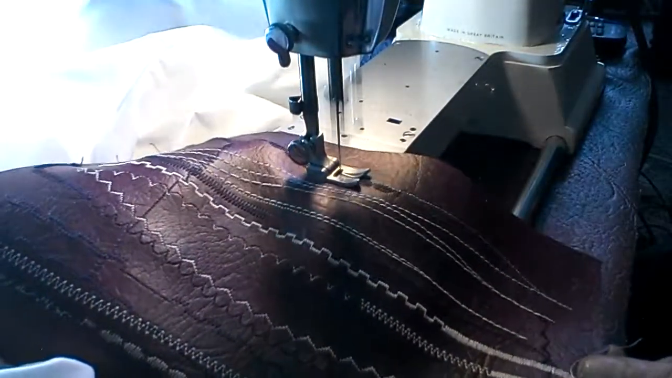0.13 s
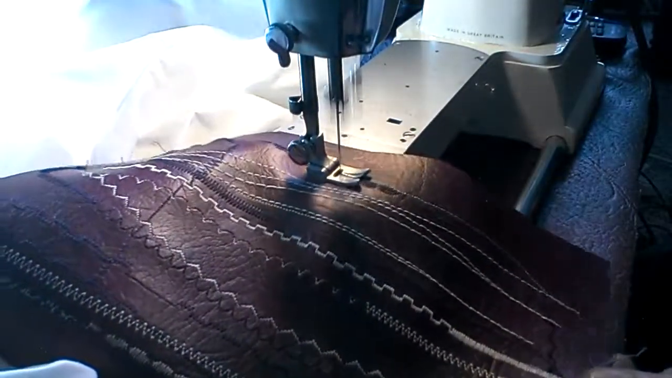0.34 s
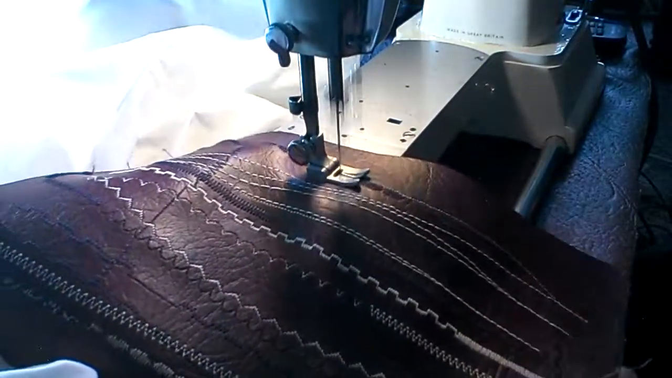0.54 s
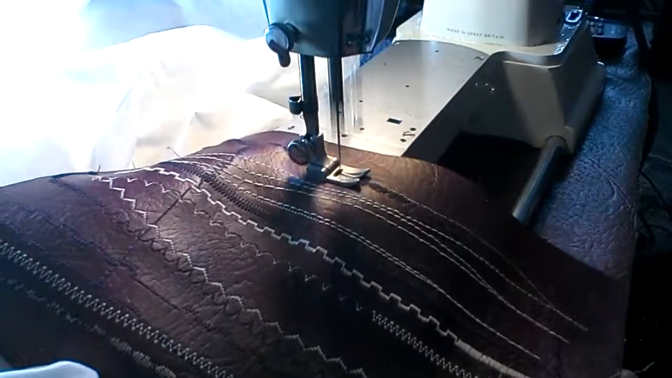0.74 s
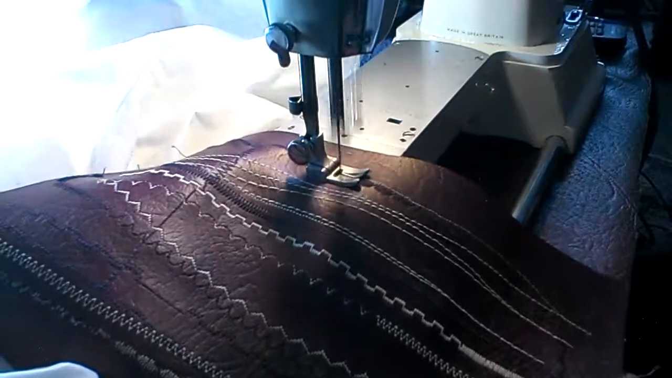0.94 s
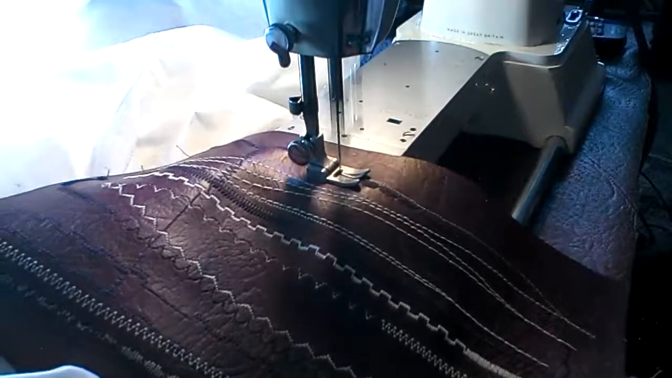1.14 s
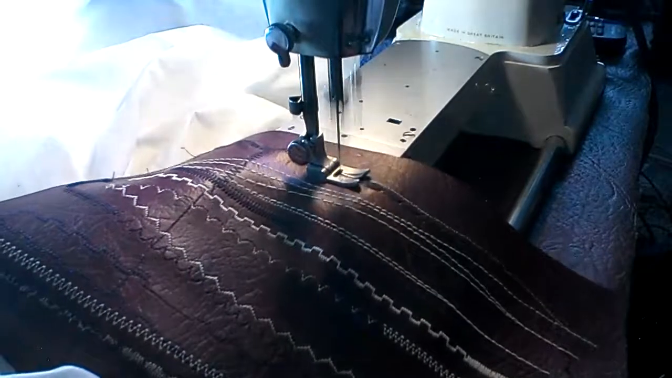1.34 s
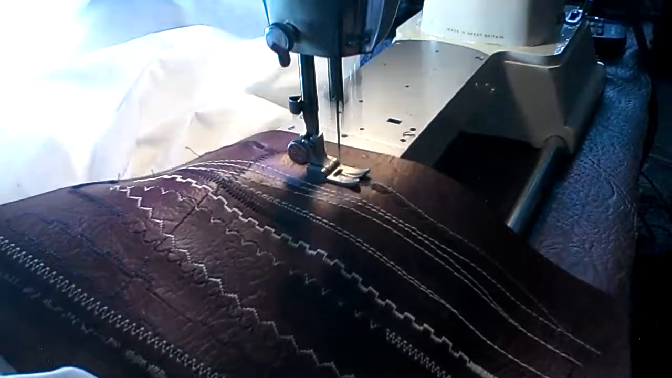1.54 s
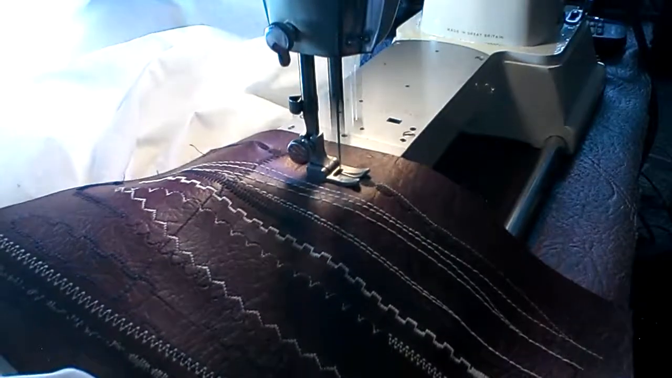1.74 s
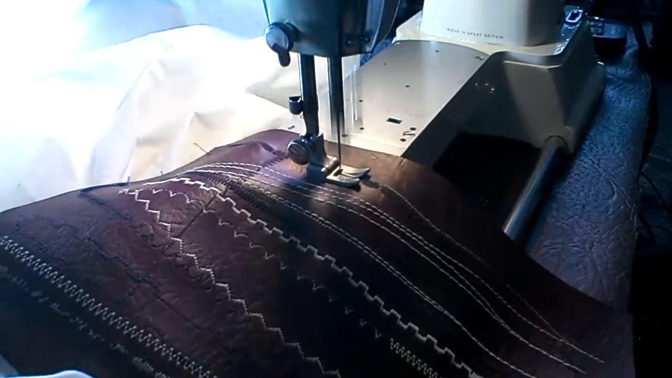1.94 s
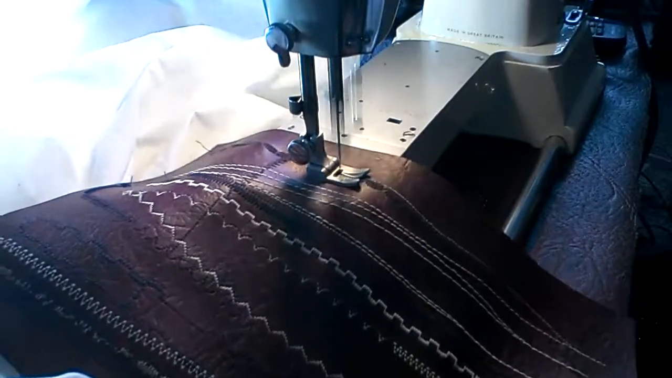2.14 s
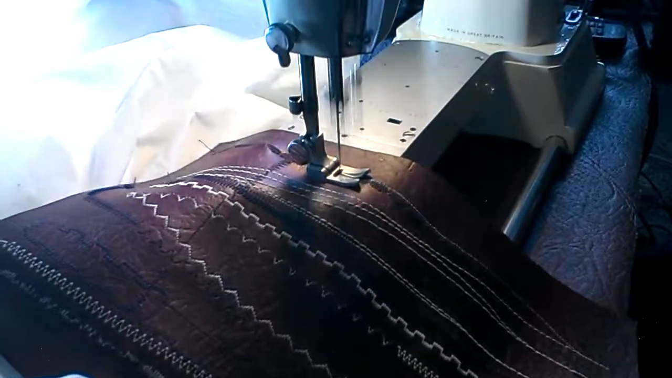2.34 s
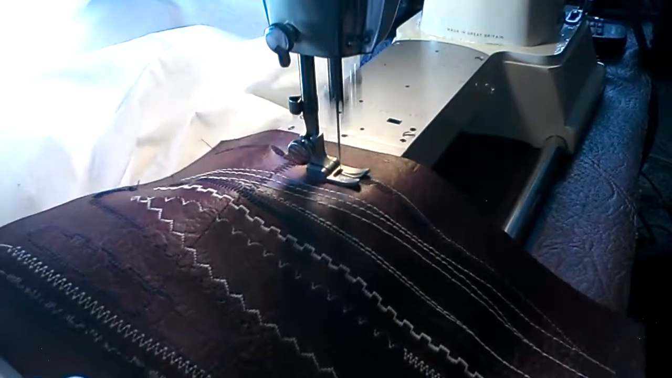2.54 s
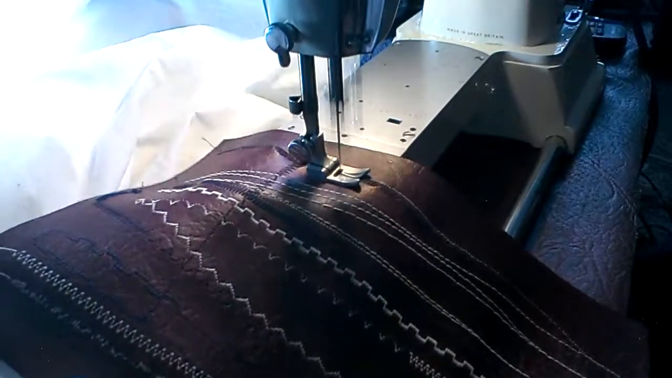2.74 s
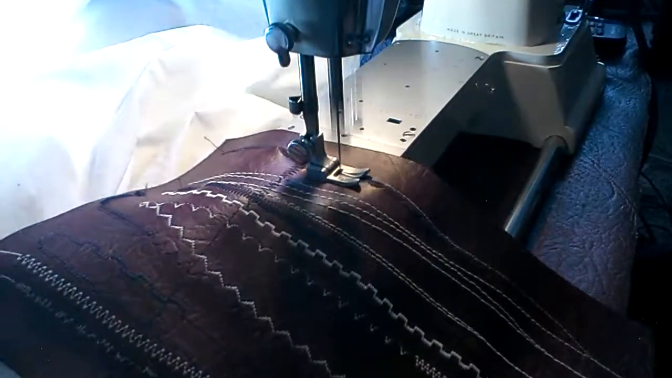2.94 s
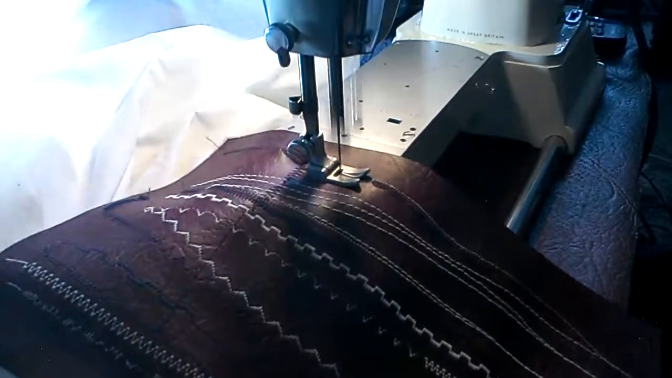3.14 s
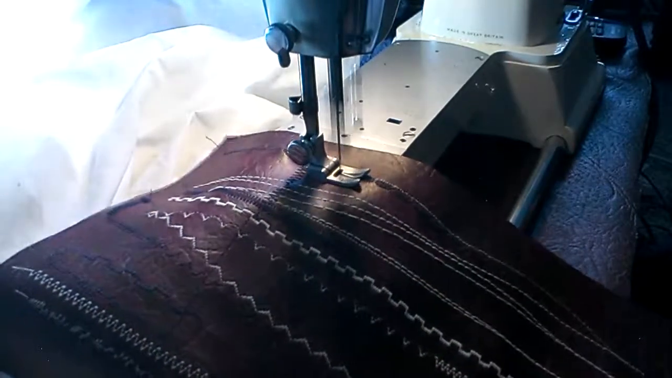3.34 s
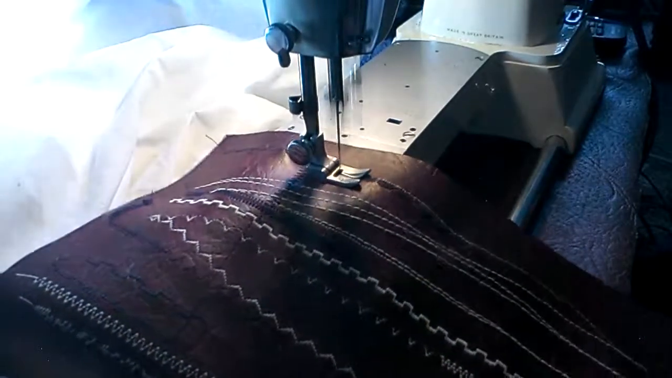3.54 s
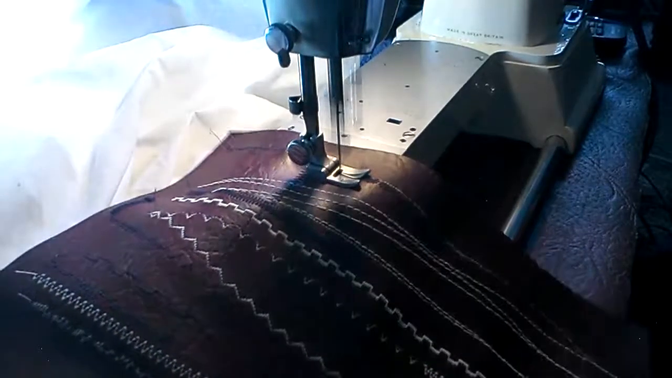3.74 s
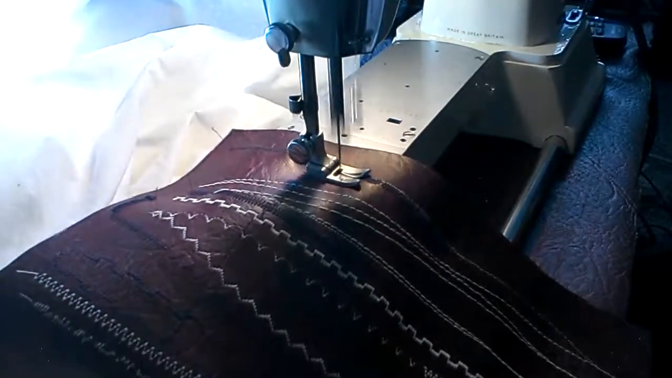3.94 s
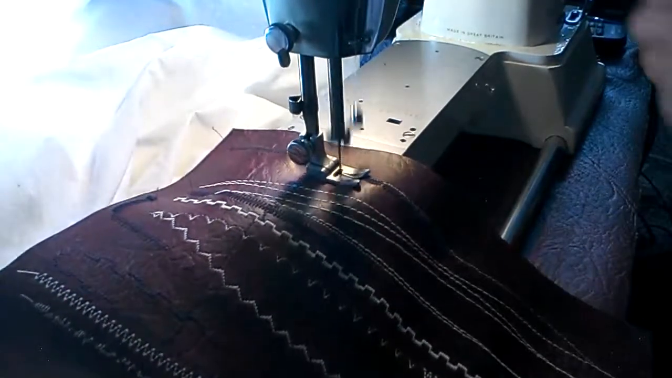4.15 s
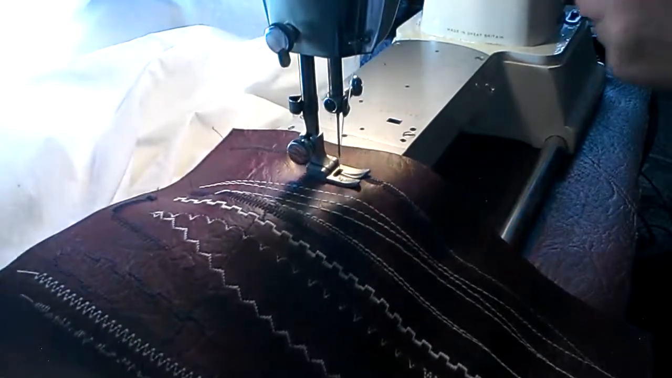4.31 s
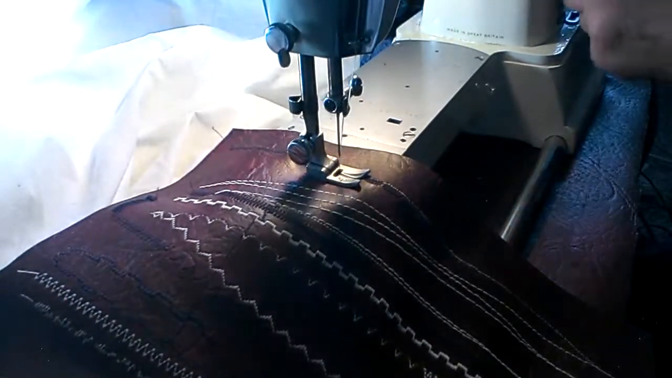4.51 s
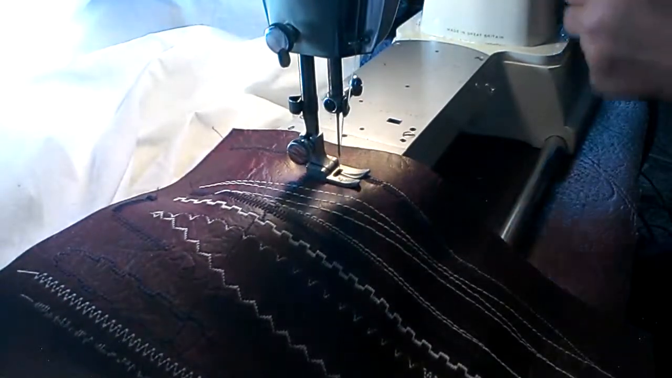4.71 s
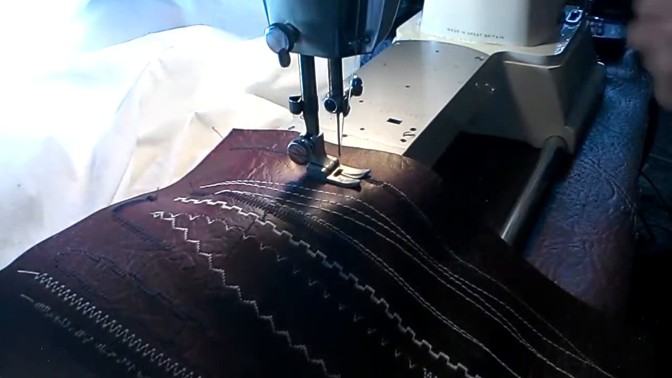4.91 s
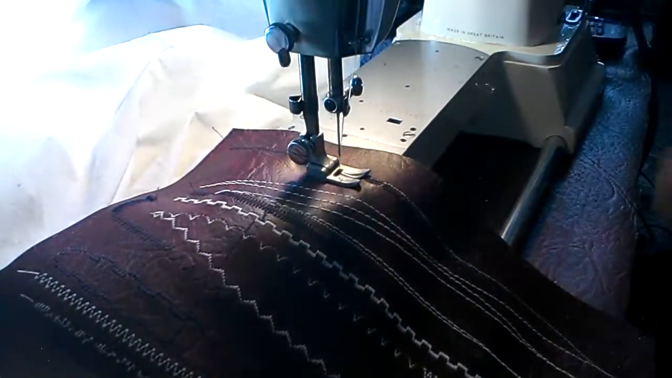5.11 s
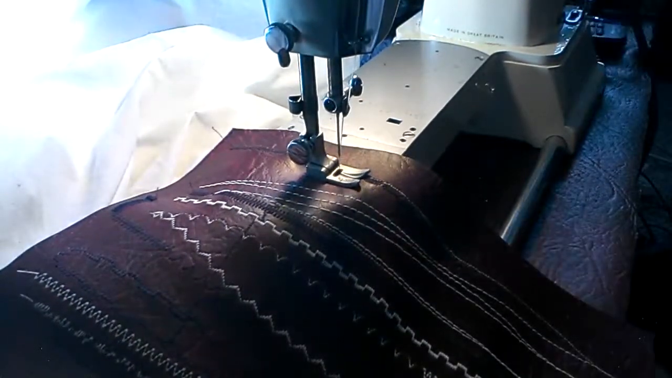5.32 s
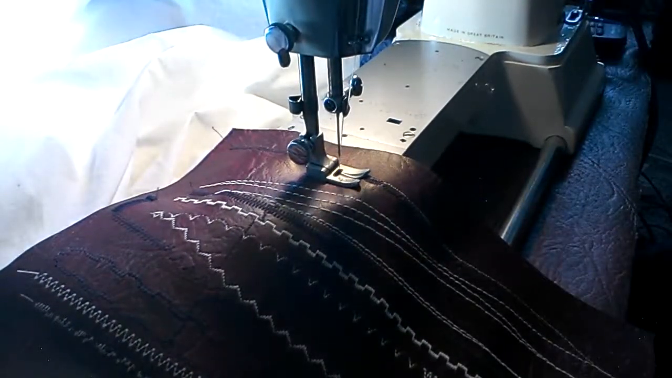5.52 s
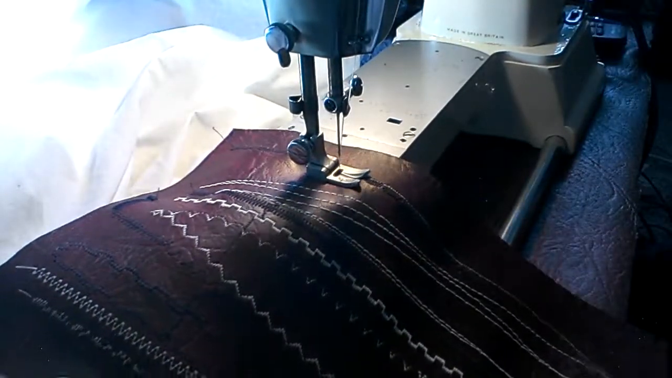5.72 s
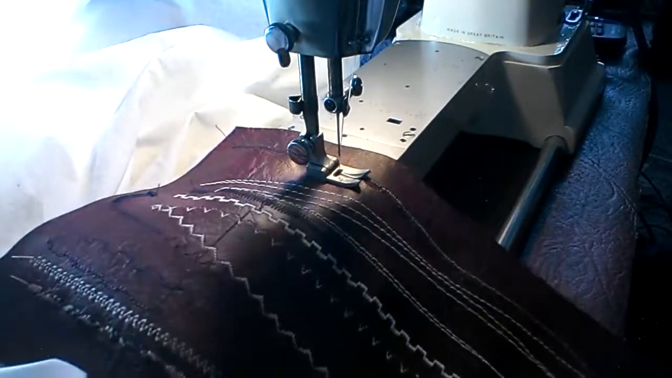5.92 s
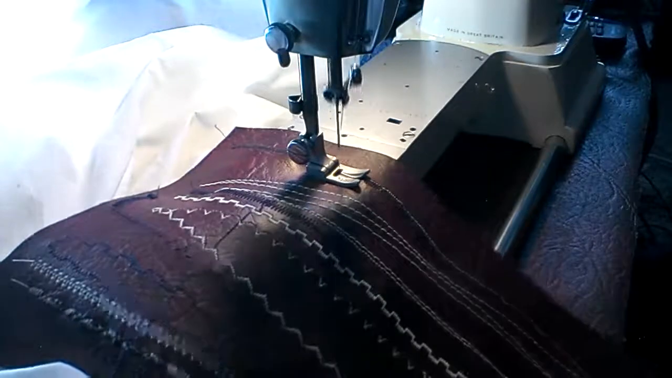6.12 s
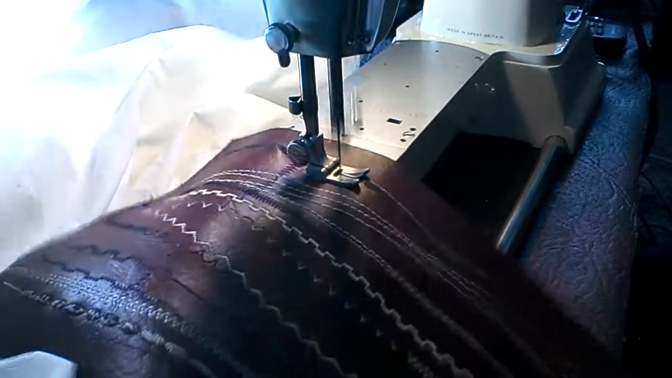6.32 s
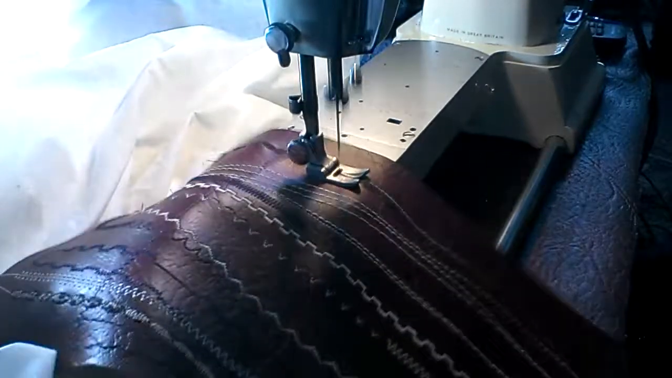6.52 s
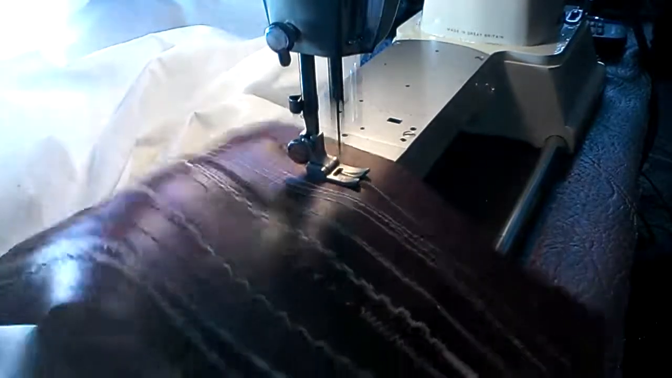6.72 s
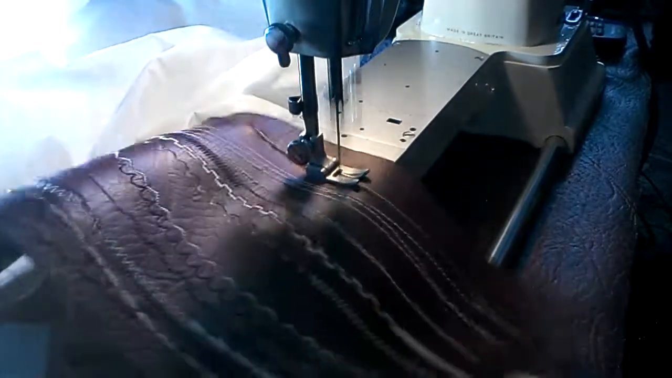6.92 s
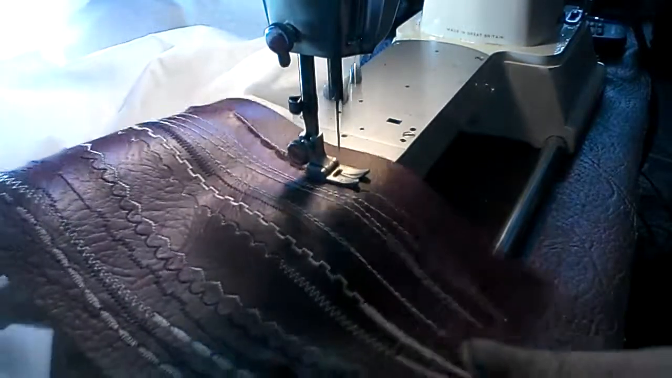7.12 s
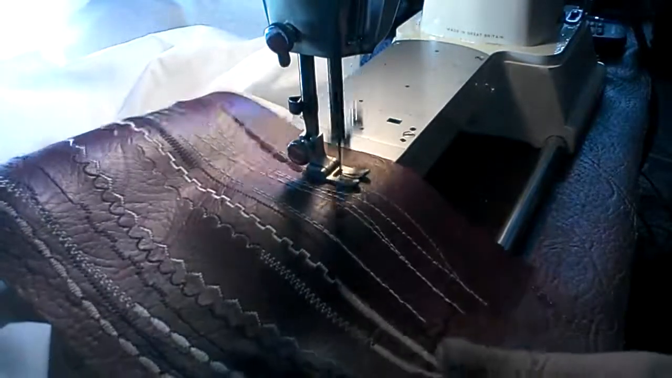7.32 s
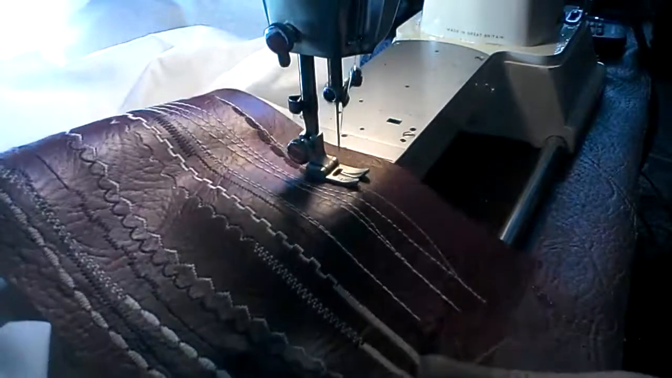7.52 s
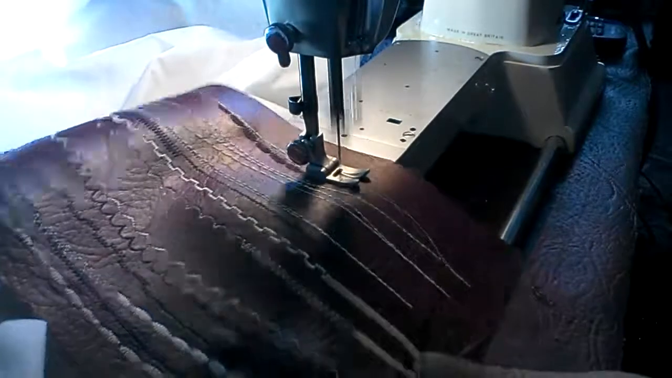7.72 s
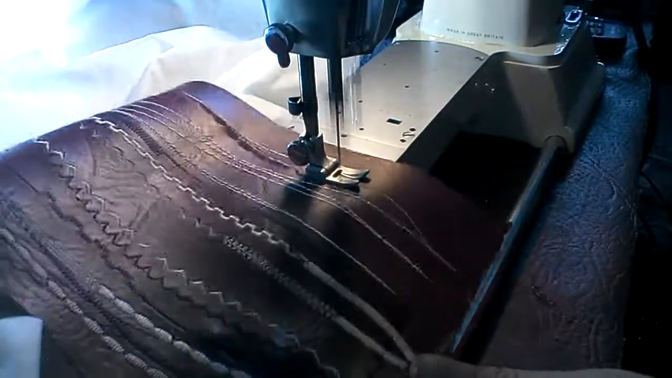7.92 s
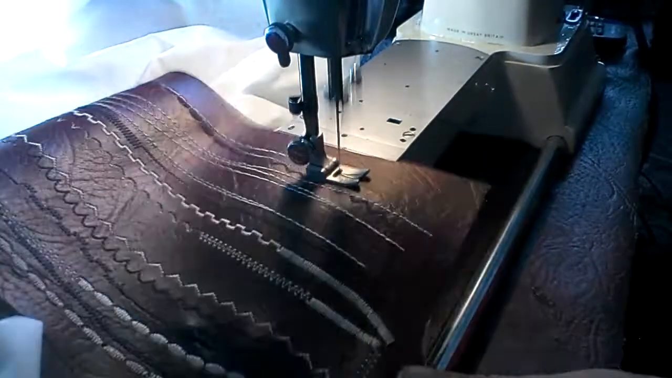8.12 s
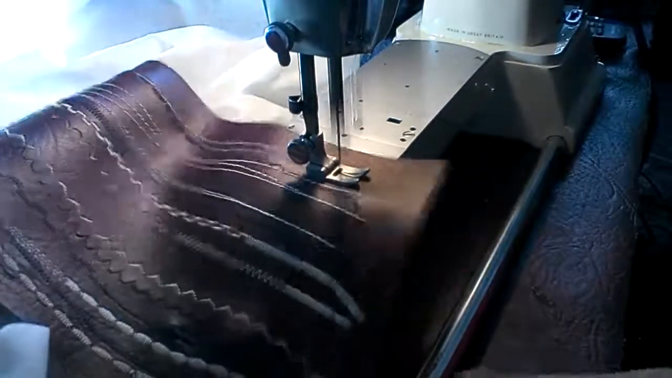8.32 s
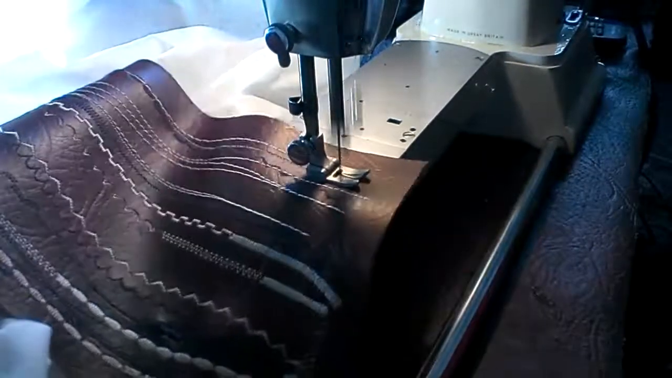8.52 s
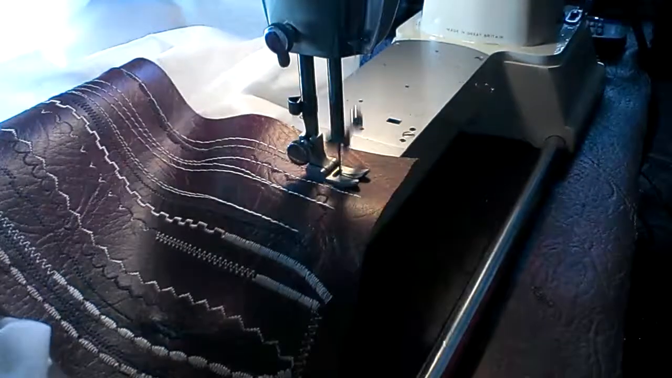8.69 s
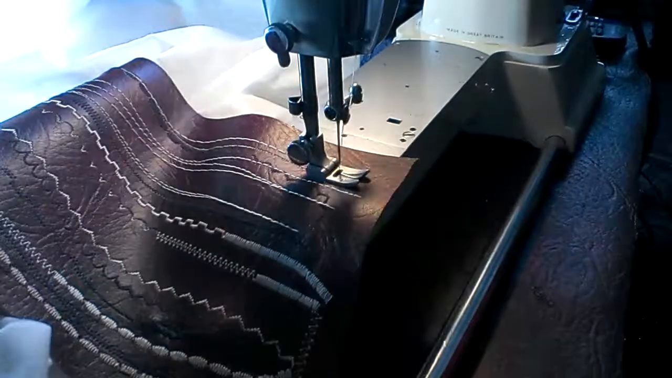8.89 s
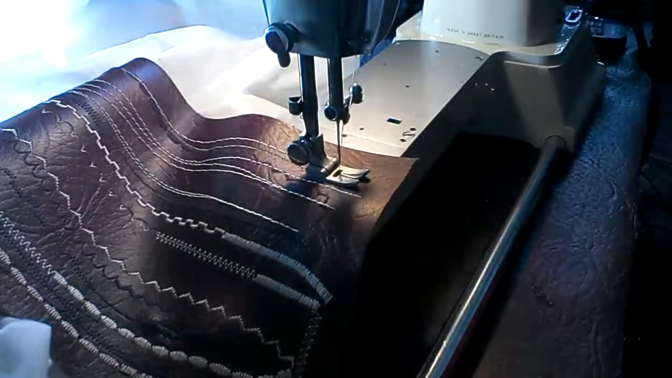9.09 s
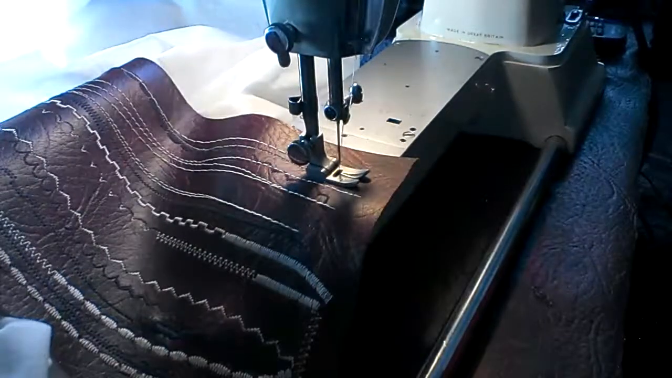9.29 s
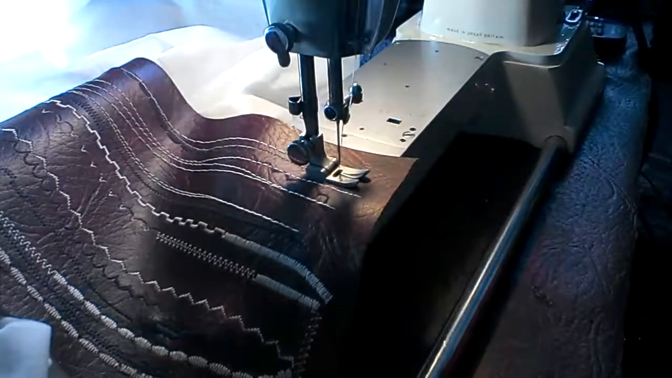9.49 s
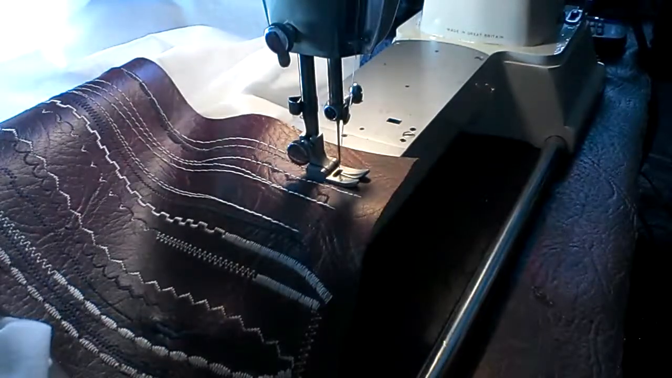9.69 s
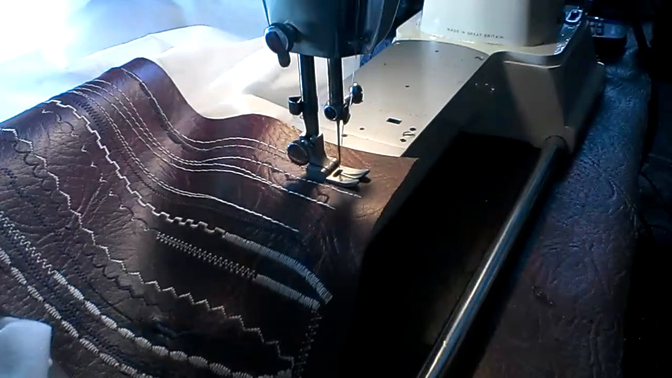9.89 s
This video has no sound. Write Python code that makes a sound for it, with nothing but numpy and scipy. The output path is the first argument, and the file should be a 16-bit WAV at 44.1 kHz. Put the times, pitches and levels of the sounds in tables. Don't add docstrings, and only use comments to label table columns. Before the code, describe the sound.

A close microphone in a small furnished room picks up a sewing machine working thick leather. From 0 to 3.7 seconds it runs fast and steady, about twenty-one turns a second: bright hook knocks, sharp needle snaps and small feed ticks merge into a hard metallic rattle over gritty gear whir and dull thumps in the bed, slightly heavier after 2 seconds. It coasts down and stops around 4.3. A crisp lever click comes at 4.8, then quiet with room hiss, faint street murmur, low distant engines and tiny knocks. A softer pedal click at 6.15 starts a burst that quickens until about 7, then slows to a stop near 7.6 with another click. A second burst follows at once, peaks near 8.3 and winds down into separate ticks by 8.95. Only the quiet background remains to about 10.

```python
import sys
import numpy as np
from scipy import signal
from scipy.fft import rfft, irfft, next_fast_len
from scipy.io import wavfile
from scipy.ndimage import uniform_filter1d

SR = 44100
rng = np.random.default_rng(int(sys.argv[2]) if len(sys.argv) > 2 else 0)


def magnitude_from_level(level_db):
    exponent = np.asarray(level_db, float) / 20
    return 10 ** exponent


def generate_wav(sig):
    pcm = np.round(np.clip(np.atleast_2d(sig).T, -1, 1) * 32767).astype(np.int16)
    wavfile.write(sys.argv[1], SR, pcm)


N = 438778
T = np.arange(N) / SR

# [f/Hz, level/dB]
HISS_COLOUR = [(25, -9), (75, -12.5), (150, -17), (310, -15.5), (480, -24), (1000, -19), (1500, -20),
               (2700, -20.5), (3500, -12.5), (4400, -13), (6000, -16.5), (9500, -28), (12000, -31.5),
               (15800, -22)]
# [t/s, level/dB]
MURMUR = [(4.5, -13), (6, -13), (9, -10.5)]
# [start t/s, length/s, first f/Hz, last f/Hz, level/dB]
ENGINES = [(-.3, 2.9, 74.5, 69.4, -61.5), (.95, 0.88, 68.7, 77, -50.5), (1.808, .7, 79, 62.2, -49),
           (2.296, 0.96, 67.4, 47, -56.5), (3.096, 1.88, 66.5, 79.3, -58.5), (4.7, 2.35, 68.8, 66.5, -66),
           (6.305, 0.65, 64.5, 73.7, -57), (6.803, 1.8, 62.7, 68, -54.5), (4.15, 0.62, 151.4, 158.7, -69.5),
           (7.99, 1.1, 71.6, 75, -64), (8.65, 0.76, 152.7, 147, -63), (9.3, 1.3, 141.7, 126, -66.5),
           (9.4, .8, 70, 68, -68)]
# [t/s, peak level/dB]
CLICKS = [
    (4.7507, -46),
    (4.793, -25.5),
    (6.149, -33),
    (7.5637, -34),
]
# [t/s, f/Hz, level/dB]
KNOCKS = [(4.751, 480, -51.5), (5.56, 1990, -57), (5.82, 2100, -56), (9.11, 1910, -59), (7.57, 1730, -45.5)]
# [f/Hz, level/dB, t60/s]
LEVER_RING = [(2500, -1, 0.014), (2850, 8.5, 0.011), (3570, 4, 0.01), (4000, -3, 0.015), (4600, 1.5, 0.027),
              (5150, 5.5, 0.014), (5700, -12, 0.0087), (6400, -20, 0.0064), (7070, -17, .005),
              (9900, -24, .004)]
# [t/s, turns per s]
SPEED = [(0.0, 20.887), (0.823, 20.88), (1.691, 21.048), (2.423, 20.719), (2.81, 20.797), (3.706, 20.766),
         (4.331, 0.0), (6.109, 0.0), (6.451, 12.248), (6.713, 16.424), (7.022, 18.458), (7.323, 8.176),
         (7.579, 0.0), (7.783, 9.595), (8.043, 15.027), (8.331, 17.769), (8.611, 8.628), (8.971, 0.0)]
# [t/s, level/dB]
LEATHER = [(0, -3.5), (1.4, -1.5), (2.4, -1), (3.3, 0), (3.5, -11), (6.8, -3), (7.1, -0.5), (8.1, -2),
           (8.38, 1), (8.45, 1)]
# [f/Hz, level/dB]
WHIR_COLOUR = [(20, -30), (100, -6), (200, -13.5), (350, -15.5), (520, -3), (860, -17), (1300, -13.5),
               (2000, -13), (2900, -12.5), (4900, -5), (6300, -14.5), (7700, -18), (11000, -24.5),
               (15800, -23)]
# [f/Hz, width/Hz, level/dB]
CASE = [(1157, 370, 7), (1656, 30, 0.5), (2450, 210, 3), (3390, 59, -2.5), (4730, 250, 4.5),
        (9700, 450, 3.5)]
# [share of turn, level/dB]
WHIR_SWELL = [(0, 7), (.2, 6), (.33, 4), (.45, 7), (.6, 7.5), (.72, 5), (.92, 3), (1, 3.5)]
# [multiple of the turn rate, level/dB]
UNBALANCE = [(1, 6), (2, 1.5)]
# [share of turn, level/dB]
THUMPS = [(.05, -3.5), (.41, -7), (.22, -13), (.6, -14), (.78, -14)]
# [f/Hz, level/dB, t60/s]
BED_RING = [(398, 3.5, .14), (420, 0, .14), (441, -3, .14), (500, 2, .14), (522, 6, .14), (587, -4, .12),
            (630, -4, .1)]
# [f/Hz, level/dB, t60/s]
BED_ON_SEAM_RING = [(394, 7, .14), (415, 5, .14), (436, -2, .14), (479, -1, .14), (539, 8, .14),
                    (581, -3, .12), (667, -8, .1)]
# [f/Hz, level/dB, t60/s]
TABLE_RING = [(134.6, 6.5, 0.11), (147, -5, 0.23), (266, -7, 0.17)]
# [f/Hz, level/dB, t60/s]
FEED_RING = [(1700, -11, .008), (2320, -1, 0.011), (2780, -3, 0.0081), (3570, -1, 0.0088),
             (4360, 6.5, 0.025), (4850, 7, 0.012), (5600, 1, 0.0086)]
# [t/s, peak level/dB]
TICKS = [
    (4.2507, -41),
    (6.2958, -36),
    (6.513, -35),
    (7.4153, -36),
    (7.445, -39),
    (7.6807, -33.5),
    (8.4742, -26),
    (8.684, -32),
    (8.7208, -34.5),
    (8.944, -43),
]
# [f/Hz, level/dB, t60/s]
HOOK_RING = [(3695, 1.8, .011), (3110, -15, 0.051), (4305, -2, 0.014), (4920, 3.5, 0.007),
             (12500, -12, 0.0033), (14400, -34, 0.0027)]
# [f/Hz, level/dB, t60/s]
SHUTTLE_RING = [(5630, 5.5, 0.017), (2600, 7, 0.01), (1700, 4, 0.019), (1180, -4, 0.039)]
# [f/Hz, level/dB, t60/s]
NEEDLE_RING = [(3840, 4.5, 0.011), (4470, -2.5, 0.02), (4900, 9, 0.0046), (6180, -0.5, 0.0059),
               (7140, -24, 0.012), (8150, -24, 0.0033), (9500, -4.5, 0.0044), (12300, -38, 0.0036),
               (14200, -16, 0.0054), (2355, -8.5, 0.022), (1150, -16, 0.028)]

HOOK_LAW, SNAP_LAW, WHIR_LAW = (-28.5, 3.36, 0.32), (-24.5, 10.4, 0.3), (-40, 6.26, 0.83)
BED_LAW, TABLE_LAW, BELT_LAW = (-47.5, 4.9, 0.58), (-54.5, 5.5, 0.3), (-59.5, 1.9, 6.4)


def level(x):
    return x / np.sqrt(np.mean(x ** 2))


def curve(rows):
    s, *columns = np.transpose(rows)
    return [np.interp(T, s, c) for c in columns]


def walk(rate):
    hold = int(SR / rate)
    steps = np.repeat(rng.standard_normal(N // hold + 1), hold)
    return 0.7 * uniform_filter1d(uniform_filter1d(steps, hold), hold)[:N]


def coloured(x, tone, peaks=()):
    size = next_fast_len(N)
    hz = np.arange(size // 2 + 1) * SR / size + 1
    tone_hz, tone_db = np.transpose(tone)
    db = np.interp(np.log(hz), np.log(tone_hz), tone_db)
    for f, width, peak_db in peaks:
        db = db + peak_db / (1 + (2 * (hz - f) / width) ** 2)
    return level(irfft(rfft(x, size) * magnitude_from_level(db), size)[:N])


def blows(s, db, rattle_ms, modes, rough=0.61):
    size = int(max(m[2] for m in modes) * SR) + 512
    k = np.arange(512) / (rattle_ms * SR / 1000)
    rattle = k * np.exp(-k) * rng.standard_normal((len(s), 512))
    rattle = rattle / np.sqrt(np.sum(rattle ** 2, axis=1, keepdims=True))
    tap = np.arange(512) == np.argmax(k > 1 / 2)
    hit = rough * rattle + (1 - rough) * tap
    edge = signal.butter(4, min(m[0] for m in modes) * 5 / 6, "high", fs=SR, output="sos")
    hit = signal.sosfilt(edge, np.pad(hit, ((0, 0), (0, size - 512))))
    sound = 0
    for hz, mode_db, t60 in modes:
        p = np.exp(2j * np.pi * hz / SR - np.log(1000) / (t60 * SR))
        sound = sound + magnitude_from_level(mode_db) * signal.lfilter([p.imag], [1, -2 * p.real, abs(p) ** 2], hit)
    sound = sound * (magnitude_from_level(db) / np.max(np.abs(sound), axis=1))[:, None]
    out = np.zeros(N + SR)
    for t, row in zip(s, sound):
        out[int(t * SR) + 1024:][:size] += row
    return out[1024:N + 1024]


def air():
    noise = coloured(rng.standard_normal(N), HISS_COLOUR)
    low = signal.sosfilt(signal.butter(2, 1300, fs=SR, output="sos"), noise)
    rustle = signal.sosfilt(signal.butter(1, [3200, 5200], "band", fs=SR, output="sos"), noise)
    restless = rustle * (magnitude_from_level(2 * walk(11)) - 1)
    treble = level(noise - low + restless) * magnitude_from_level(walk(7) / 2)
    murmur = level(low) * magnitude_from_level(curve(MURMUR)[0] + walk(3.3) + 8.0)
    return magnitude_from_level(-58.5) * (murmur + treble)


def street():
    out, waver_hz, flutter = 0, 1.1 * walk(7.4), magnitude_from_level(2 * walk(7))
    for start, length, first_hz, last_hz, db in ENGINES:
        share = np.clip((T - start) / length, 0, 1)
        hz = first_hz + (last_hz - first_hz) * share + waver_hz
        swell = np.sin(np.pi * share ** 0.7) ** 0.84
        out = out + np.sqrt(2) * magnitude_from_level(db) * swell * np.sin(2 * np.pi * np.cumsum(hz) / SR)
    return out * flutter


def room(x, t60=0.68, wet_db=-12):
    t = T[:SR // 2]
    tail = rng.standard_normal(len(t)) * np.exp(-np.log(1000) * t / t60) * (t > 0.004)
    dull = signal.lfilter([1], [1, -0.3], tail)
    tail = signal.sosfilt(signal.butter(2, 800, "high", fs=SR, output="sos"), dull)
    return x + magnitude_from_level(wet_db) * signal.fftconvolve(x, tail / np.sqrt(np.sum(tail ** 2)))[:N]


def lever():
    s, db = np.transpose(CLICKS)
    out = blows(s - 1 / 1000, db - 1.0, 1.15, LEVER_RING, rough=0.74)
    for t, hz, knock_db in KNOCKS:
        out = out + blows([t], np.array([knock_db]), 0.22, [(hz, 0, 0.055)], rough=0.05)
    return out


def shaft():
    speed, = curve(SPEED)
    angle = 0.063 + np.cumsum(speed + 1e-6) / SR
    full_pull = 69
    pull = uniform_filter1d(np.clip(np.gradient(speed) * SR / full_pull, -1, 1), SR // 20)
    return speed, angle, pull


def loudness(law, speed, pull):
    db, halving_db, pull_db = law
    creep, full_speed, stall = 1.4, 19.5, 0.07
    pulling = np.maximum(pull, 0)
    effort = np.maximum(speed - creep, 0) / full_speed + stall * pulling + 1 / 500
    return db + halving_db * np.log2(effort) + pull_db * pulling


def when(angle, share):
    return np.interp(np.arange(int(angle[-1]) + 1) + share, angle, T)


def chance(angle):
    return rng.standard_normal(int(angle[-1]) + 1)


def shake(speed, angle, pull):
    sway = sum(magnitude_from_level(db) * np.sin(2 * np.pi * k * angle) for k, db in UNBALANCE)
    hum = magnitude_from_level(-62) * np.maximum(pull, 0) * np.sin(2 * np.pi * 95.4 * T)
    return sway * (0.04 * speed) ** 2 * magnitude_from_level(-56) + hum


def gear_whir(angle, whir_db):
    uneven_db = 0.9 * rng.exponential(size=N) + 1.2 * walk(250) + 0.5 * walk(40)
    grains = rng.standard_normal(N) * magnitude_from_level(uneven_db)
    swell_db = np.interp(angle % 1, *np.transpose(WHIR_SWELL))
    return coloured(grains * magnitude_from_level(swell_db), WHIR_COLOUR, CASE) * magnitude_from_level(whir_db)


def belt(speed, angle, pull, whir_db):
    rub = coloured(rng.standard_normal(N), [(1000, -40), (3000, -40)], [(1750, 420, 40)])
    slip_db = 2.2 * np.cos(2 * np.pi * (angle - 0.55))
    db = loudness(BELT_LAW, speed, pull) + 0.5 + np.minimum(whir_db + 50.5, 0)
    return rub * magnitude_from_level(slip_db + db + 2 * walk(12) + 2 * walk(40))


def bed_thumps(speed, angle, pull):
    s = when(angle, 0)
    thick = (s > 2.06) & (s < SPEED[5][0])
    bed = 0
    for share, db in THUMPS:
        blow_db = db + 0.64 * chance(angle)
        thin_s, seam_s = when(angle, share), when(angle, share * 1.069)
        bed = bed + blows(thin_s[~thick], blow_db[~thick], 0.23, BED_RING, rough=0.22)
        bed = bed + blows(seam_s[thick], blow_db[thick] + 0.8, 0.23, BED_ON_SEAM_RING, rough=0.22)
    return level(bed) * magnitude_from_level(loudness(BED_LAW, speed, pull) - 2.5)


def table_thumps(speed, angle, pull):
    boom = blows(when(angle, 0.82), 2.0 * chance(angle), 0.13, TABLE_RING, rough=0.073)
    tune, width, tune_db = 17, 1.7, 7
    db = loudness(TABLE_LAW, speed, pull) + tune_db / (1 + ((speed - tune) / width) ** 2)
    return level(boom) * magnitude_from_level(uniform_filter1d(db, SR // 10) - 2.0)


def feed_ticks(angle, hook_db):
    s = when(angle, 0.58 + 0.015 * chance(angle))
    feed = blows(s, hook_db - 14 + 2.2 * chance(angle), 1.5, FEED_RING)
    lone_s, lone_db = np.transpose(TICKS)
    return feed + blows(lone_s - 0.001, lone_db, 1.0, FEED_RING)


def hook_knocks(angle, hook_db):
    s = when(angle, 0)
    hook = blows(s - 1 / 1500, hook_db + 2.0, 0.81, HOOK_RING, rough=0.64)
    return hook + blows(s + 1 / 500, hook_db - 5.0 + 1.8 * chance(angle), 0.6, SHUTTLE_RING)


def needle_snaps(speed, angle, pull):
    s = when(angle, 0.415)
    coasting = np.maximum(-pull, 0) * (21 / (speed + 4) - 0.8)
    s = s + 0.0048 * np.interp(s, T, coasting)
    db = np.interp(s, T, loudness(SNAP_LAW, speed, pull) + curve(LEATHER)[0])
    return blows(s, db + 0.66 * chance(angle) + 3.5, 0.48, NEEDLE_RING, rough=0.55)


def machine():
    speed, angle, pull = shaft()
    whir_db = loudness(WHIR_LAW, speed, pull)
    hook_db = loudness(HOOK_LAW, speed, pull) - 0.27 * curve(LEATHER)[0]
    hook_db = np.interp(when(angle, 0), T, hook_db) + 1.5 * chance(angle)
    out = shake(speed, angle, pull) + gear_whir(angle, whir_db) + belt(speed, angle, pull, whir_db)
    out = out + bed_thumps(speed, angle, pull) + table_thumps(speed, angle, pull)
    out = out + feed_ticks(angle, hook_db) + hook_knocks(angle, hook_db)
    return out + needle_snaps(speed, angle, pull)


def scene():
    mono = air() + street() + room(lever() + machine())
    return np.array([mono, mono])


def roll_off(x):
    return signal.sosfilt(signal.butter(12, 16890, fs=SR, output="sos"), x)


def record(dry):
    high = signal.butter(2, 7000, "high", fs=SR, output="sos")
    treble = uniform_filter1d(np.abs(signal.sosfilt(high, dry[0])), 512)
    hiss = signal.sosfilt(high, rng.standard_normal(N)) * treble
    side = magnitude_from_level(-33) * walk(2000) * dry[0] + magnitude_from_level(-19.0) * hiss
    top = signal.ellip(8, 0.1, 45, 15850, fs=SR, output="sos")
    mix = signal.sosfiltfilt(top, dry + np.array([side, -side]))
    return roll_off(mix)


dry = scene()
out = record(dry)
generate_wav(out)
```